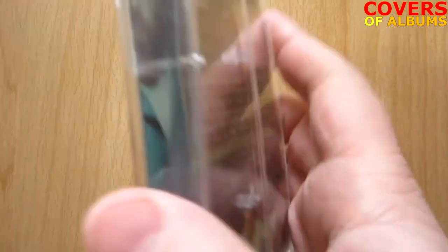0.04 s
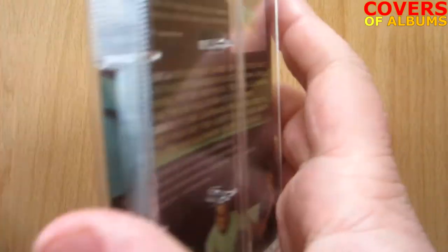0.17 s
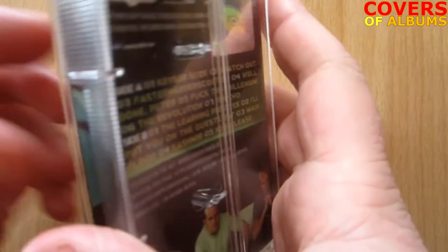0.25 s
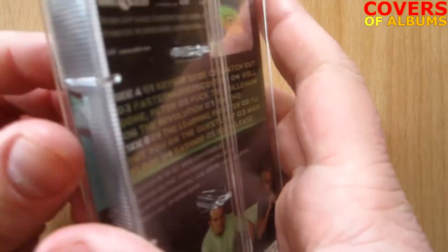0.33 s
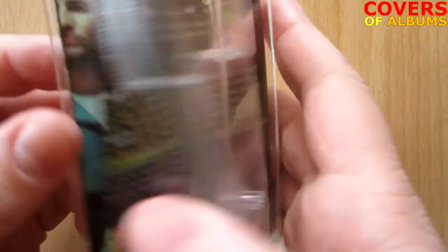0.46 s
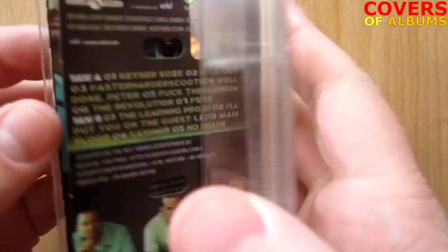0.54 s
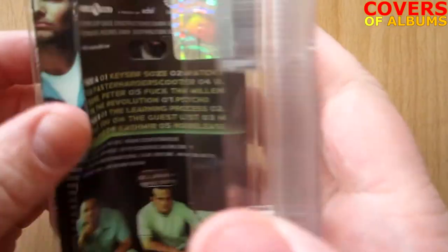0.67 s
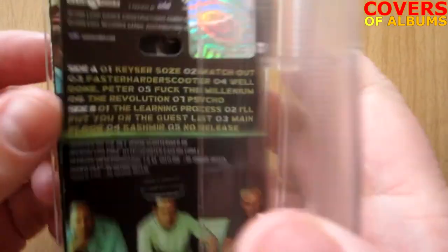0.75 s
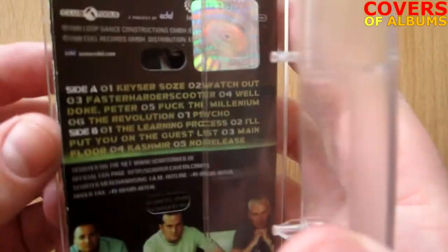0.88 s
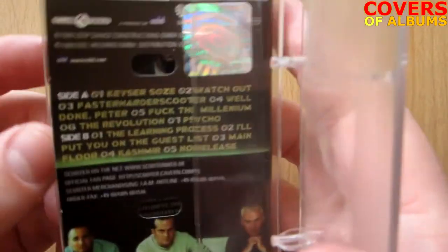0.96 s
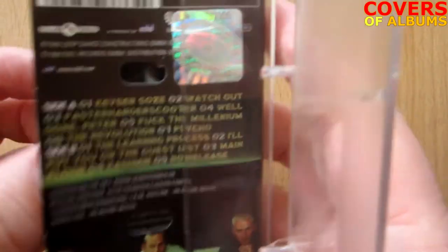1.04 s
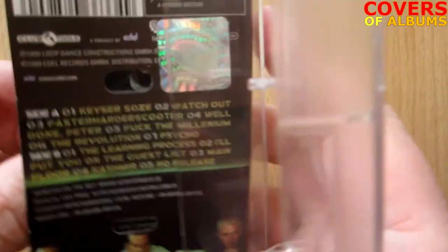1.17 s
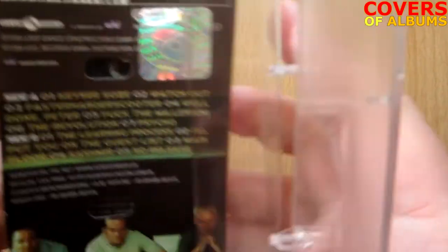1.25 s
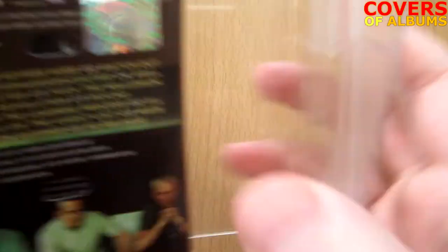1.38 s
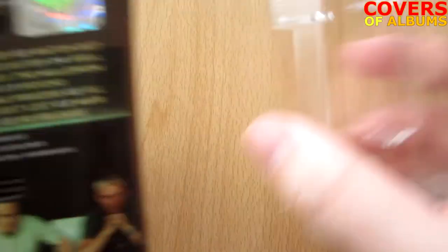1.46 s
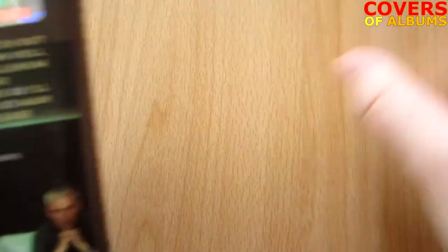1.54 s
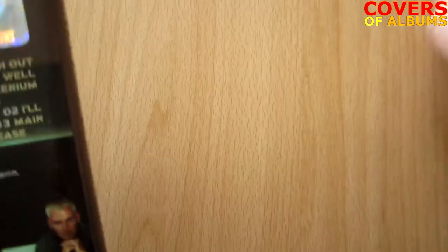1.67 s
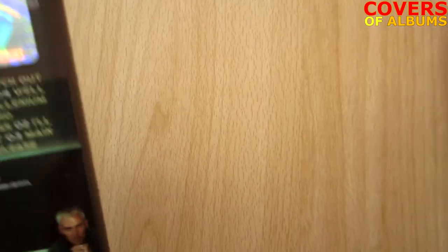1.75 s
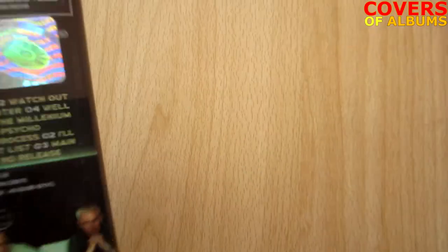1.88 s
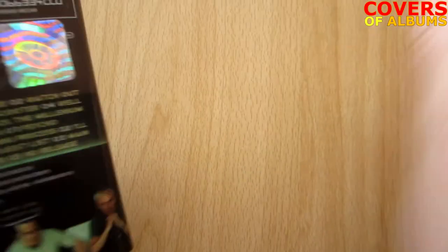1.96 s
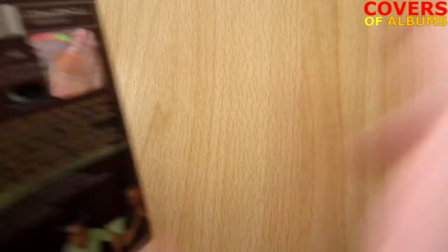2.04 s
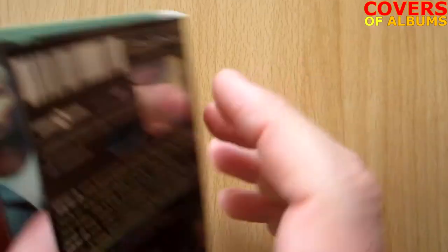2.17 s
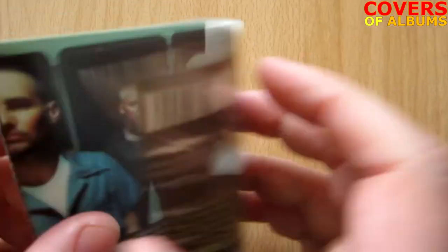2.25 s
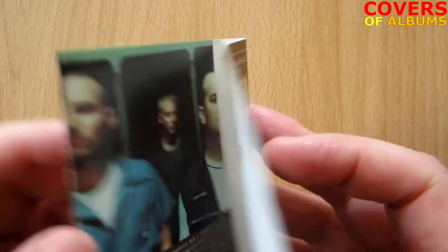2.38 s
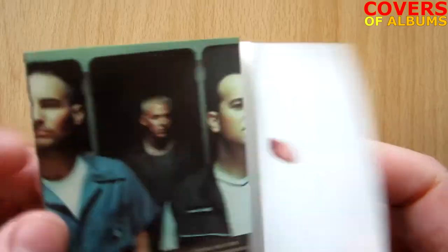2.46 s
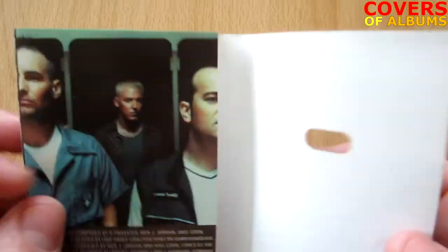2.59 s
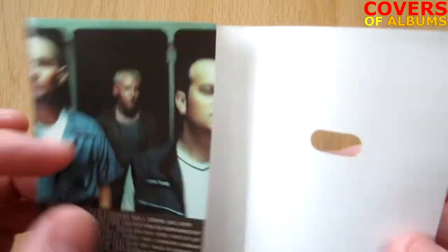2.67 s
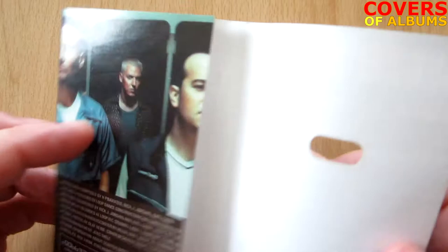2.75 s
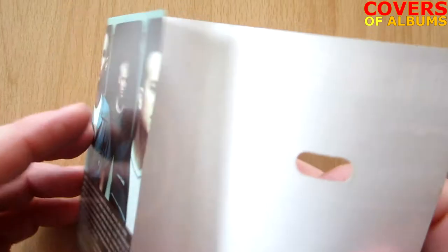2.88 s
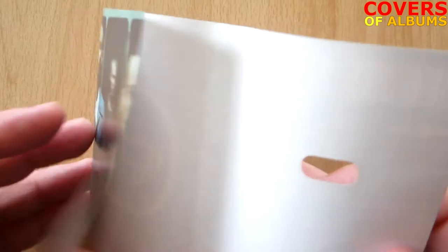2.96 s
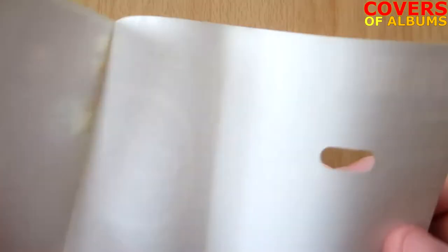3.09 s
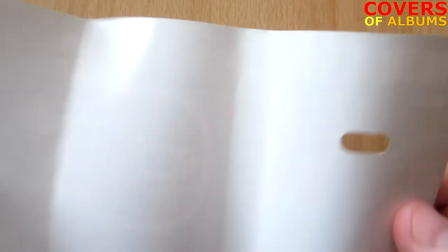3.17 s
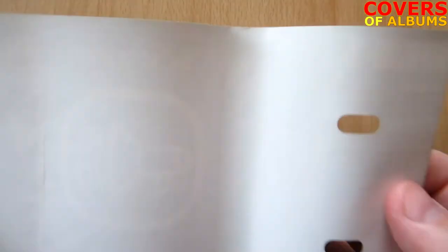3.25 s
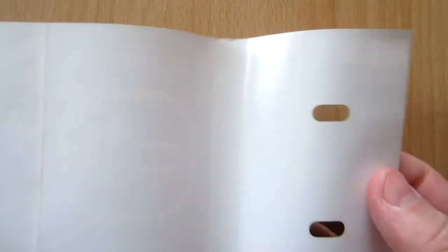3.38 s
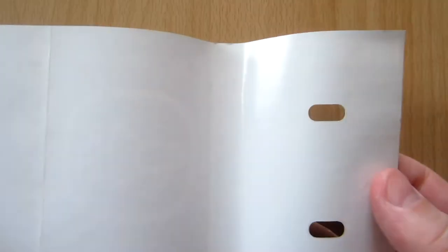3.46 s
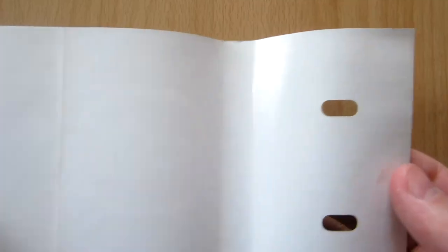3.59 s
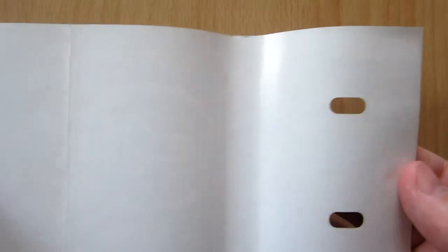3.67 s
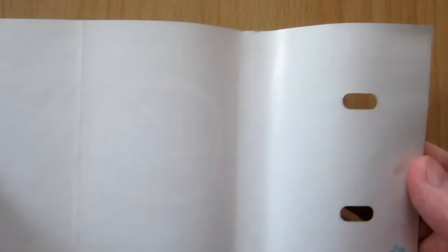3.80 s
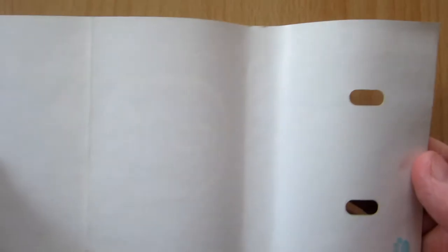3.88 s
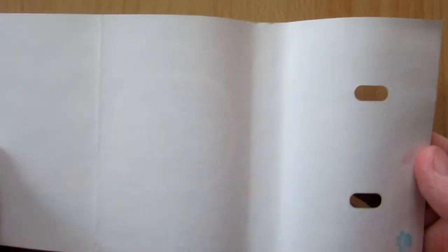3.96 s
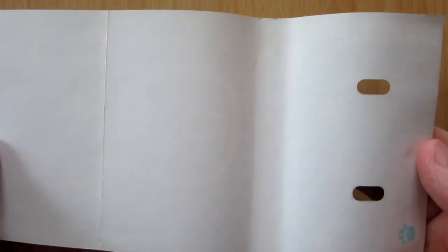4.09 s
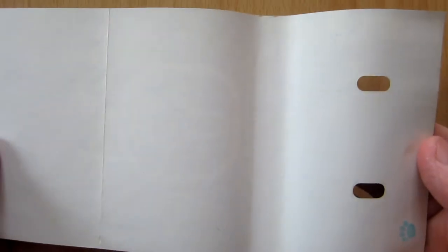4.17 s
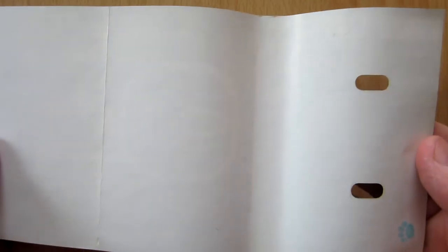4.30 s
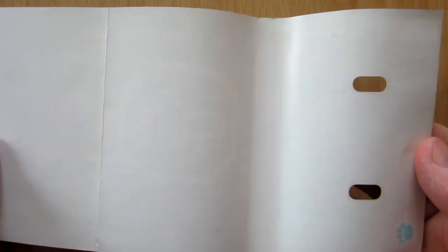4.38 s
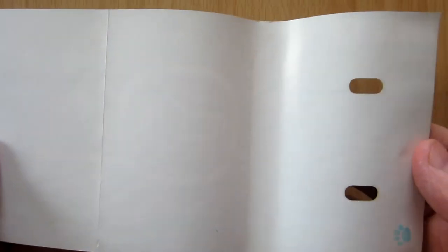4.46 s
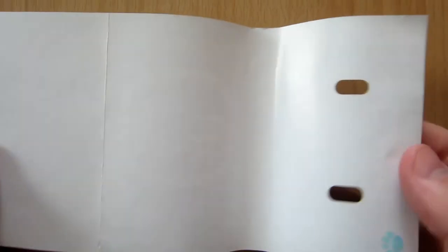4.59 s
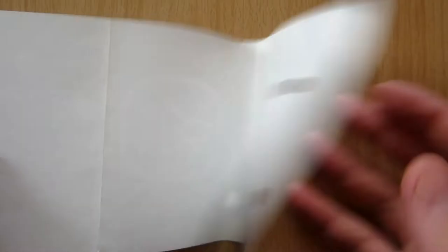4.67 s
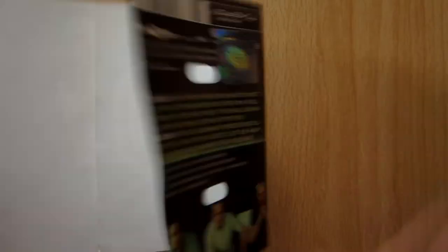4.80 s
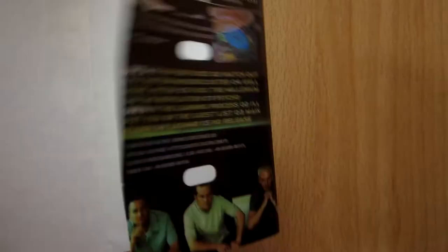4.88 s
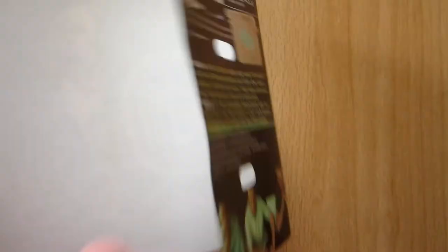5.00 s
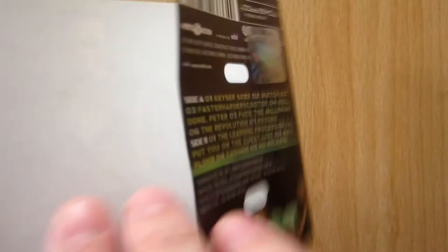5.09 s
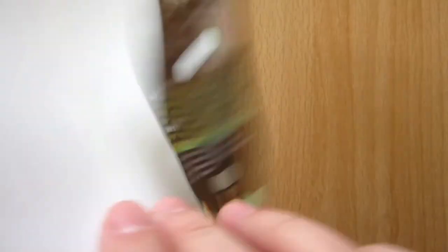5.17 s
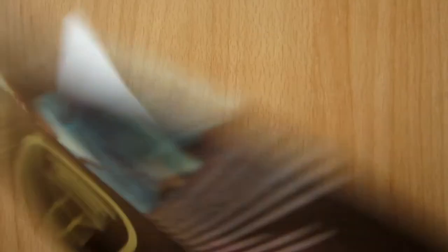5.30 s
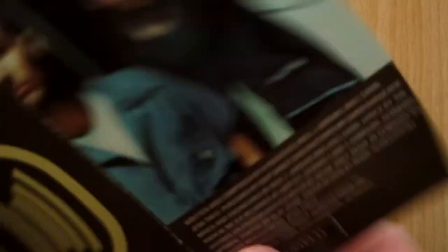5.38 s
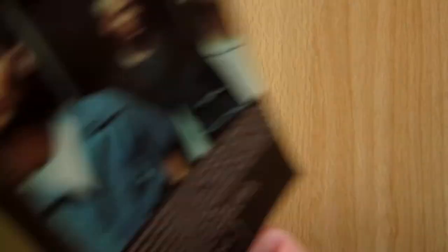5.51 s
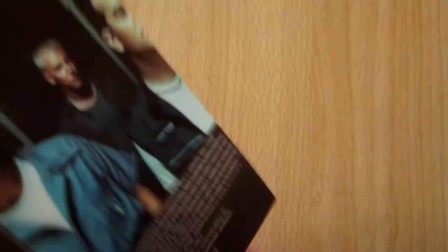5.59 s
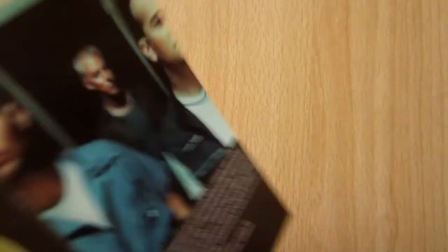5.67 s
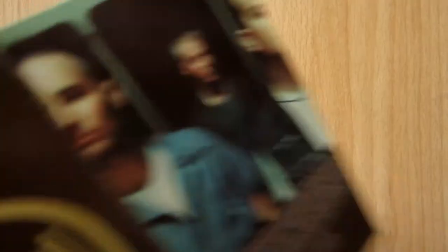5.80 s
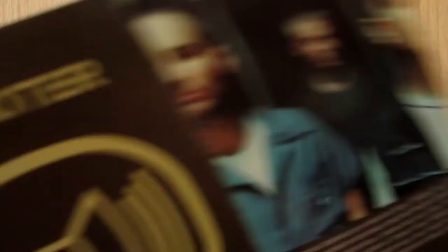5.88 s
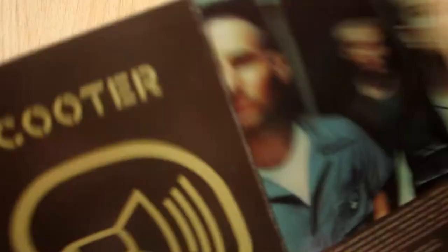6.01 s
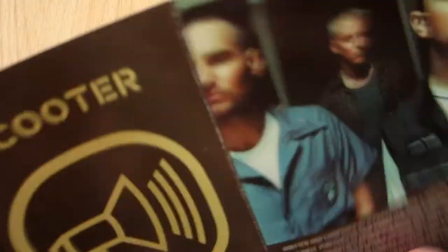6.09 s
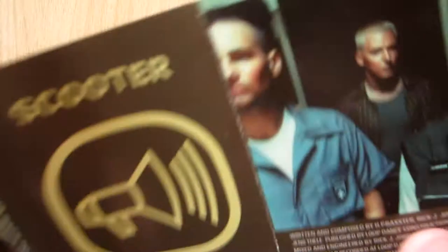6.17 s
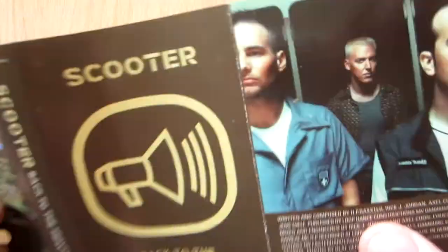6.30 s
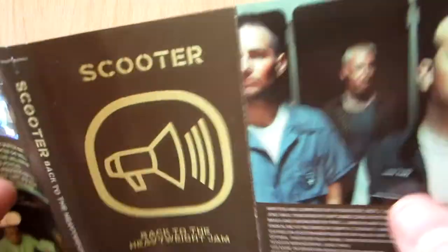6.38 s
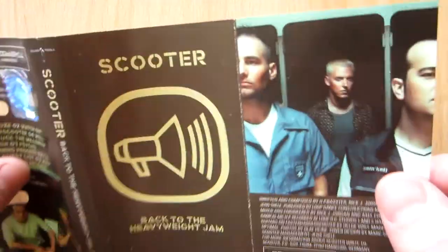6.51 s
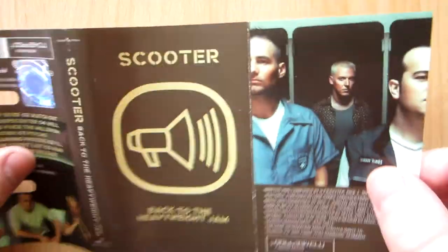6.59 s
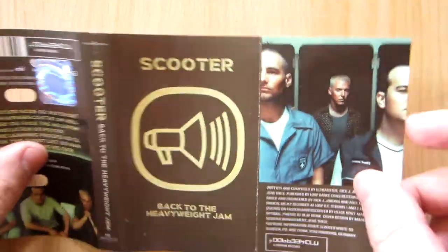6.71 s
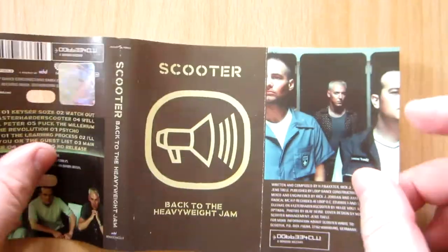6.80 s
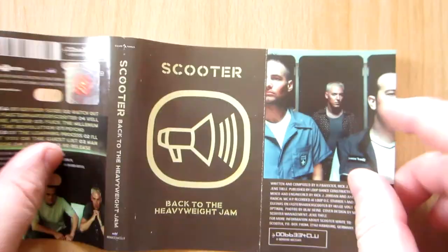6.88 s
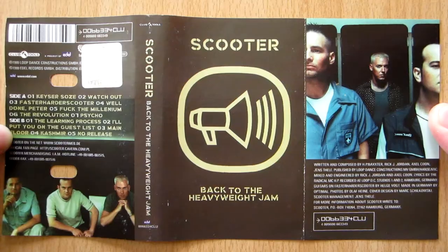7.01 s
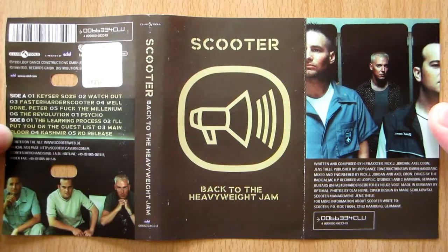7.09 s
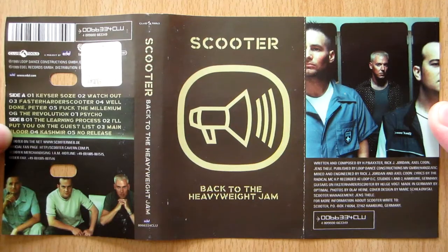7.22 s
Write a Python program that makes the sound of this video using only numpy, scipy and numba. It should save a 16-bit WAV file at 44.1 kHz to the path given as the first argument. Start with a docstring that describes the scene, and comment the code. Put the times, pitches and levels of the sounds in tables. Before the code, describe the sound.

Very close to a small camera microphone in a small room, hands clack a hard plastic case while a paper insert scrapes out of it, ending on a loud clack. After a short near-silence the sheet unfolds with light snaps and finger rubs, is held almost still over faint hiss, then flips with a sharp snap, air puffs and dull bumps on the wooden table.

```python
"""Hands slide a folded paper insert out of a plastic cassette case, close under a small camera microphone.
The case clacks, made of clicks ringing its modes, and the dragged insert scrapes as friction noise. Once it
is put down, the sheet unfolds with short resonant snaps and finger rubs, is held almost still, whistles
faintly as it tilts, then is flipped over and smoothed on a wooden table with puffs of air and dull thumps.
A small room answers the contacts, over a hiss of drawn level."""
import sys
import numpy as np
from scipy import signal
from scipy.fft import rfft, irfft, next_fast_len
from scipy.io import wavfile
from scipy.ndimage import uniform_filter1d
from numba import njit

SR = 44100
rng = np.random.default_rng(int(sys.argv[2]) if len(sys.argv) > 2 else 0)


def voltage_ratio(decibels):
    """Convert decibels (scalar or array-like) to amplitude ratios, 20 dB per decade."""
    exponent = np.asarray(decibels, float) / 20
    return 10 ** exponent


def store_pcm(level_fs):
    """Save levels as 16-bit WAV."""
    pcm = np.round(np.clip(level_fs, -1, 1) * 32767).astype(np.int16)
    wavfile.write(sys.argv[1], SR, np.atleast_2d(pcm).T)


N = 319725
TIME = np.arange(N) / SR
SILENT_DB = -110

# clacks of the case: t/s, peak level of the body/dB, strongest ring f/Hz, treble level/dB, rattle t60/s
CASE_CLACKS = [(0.024, 1, 2800, -22.5, 0.01), (0.034, -16, 3400, -17, 0.025),
               (0.167, -29, 1040, -34, 0.017), (0.336, -42.5, 1210, -24, 0.031),
               (0.409, -11.5, 1583, -22, 0.024), (0.435, -21, 1220, -23, 0.02),
               (0.477, -18.5, 3480, -18, 0.02), (0.506, -9.5, 3180, -23.5, 0.03),
               (0.635, -23.5, 2240, -32, 0.033), (0.663, -20, 2280, 6.5, 0.014),
               (0.69, -21.5, 2170, -18, 0.022), (0.763, -30.5, 1700, -6.5, 0.043),
               (0.817, -26.5, 2330, -12, 0.023), (0.847, -25.5, 2450, -29, 0.014),
               (1.07, -29, 1730, -19, 0.012), (1.127, -13, 2050, -14, 0.026),
               (1.211, -41, 3030, -22, 0.025), (1.22, -22, 1740, -27.5, 0.034),
               (1.273, -21, 2060, -12, 0.055), (1.343, -24.5, 2530, -25, 0.045),
               (1.5, -17.5, 1820, -26, 0.014), (1.525, -8, 2890, -24.5, 0.035),
               (1.612, -14, 3470, -18.5, 0.043), (1.619, -14.5, 1050, -4, 0.029),
               (1.685, -36, 3380, -29.5, 0.025), (1.71, -21.5, 1150, -26, 0.018),
               (1.719, -16.5, 1630, -33, 0.057), (1.731, -22, 1110, -29.5, 0.054),
               (1.804, -21.5, 1150, -34.5, 0.075), (1.852, -11, 1130, -31, 0.025),
               (1.868, -26, 1000, -26.5, 0.071), (1.884, -16.5, 960, -21, 0.075),
               (1.894, 0, 3460, -18.5, 0.035)]
# snaps of the paper: t/s, peak level of the body/dB, strongest ring f/Hz, treble level/dB, rattle t60/s
PAPER_SNAPS = [(2.257, -39, 2590, -20, 0.018), (2.275, -39, 2570, -20, 0.017),
               (2.307, -20.5, 2240, -33, 0.018), (2.391, -34, 2210, -15, 0.02),
               (2.438, -17.5, 2230, -14, 0.021), (2.511, -23.5, 2780, -16, 0.021),
               (2.692, -35, 1150, -11, 0.02), (2.816, -32, 4850, 0, 0.015), (2.87, -36, 3950, -25, 0.048),
               (2.969, -30, 5050, -25, 0.022), (3.008, -37, 3860, -14, 0.022),
               (3.265, -28, 4550, -24, 0.034), (3.305, -25.5, 1030, -13.5, 0.016),
               (3.427, -24.5, 2040, -20, 0.022), (3.442, -22, 1950, -20, 0.015),
               (3.889, -32, 816, -42, 0.015), (4.47, -45, 1080, -14.5, 0.022),
               (4.558, -46.5, 1470, -20, 0.018), (4.649, -35.5, 2540, -25, 0.017),
               (4.725, -14, 1260, -17, 0.036), (4.784, -41, 1620, -28, 0.014),
               (4.795, -34, 1470, -28, 0.018), (4.814, -44, 1880, -27, 0.023),
               (4.845, -39, 1206, -30, 0.02), (5.159, -28, 4630, -19, 0.02), (5.199, -17.5, 870, -9, 0.034),
               (5.223, -15.5, 2420, -16, 0.0091), (5.249, -6, 2400, -14, 0.016),
               (5.334, -24.5, 2300, -12, 0.034), (5.388, -35.5, 2340, -29.5, 0.026),
               (5.412, -34, 3860, -17, 0.028), (5.637, -28, 2230, -31, 0.022),
               (5.655, -19, 2200, -15, 0.02), (5.808, -24.5, 2100, -23, 0.026),
               (5.867, -38, 720, -13, 0.028), (5.931, -37, 2190, -27, 0.015),
               (5.996, -21.5, 2900, -28, 0.02), (6.039, -42, 5340, -11, 0.018),
               (6.107, -27, 2470, -19, 0.026), (6.136, -31, 2830, -21, 0.022),
               (6.165, -32, 2520, -18, 0.02), (6.181, -11.5, 2570, -46, 0.028),
               (6.253, -25.5, 980, -39, 0.0092), (6.309, -28, 2580, 4, 0.024),
               (6.549, -20.5, 2430, -13, 0.03), (6.576, -26.5, 1270, -28, 0.059),
               (6.66, -24, 2160, -3, 0.026), (6.701, -23, 2040, -28, 0.03), (6.769, -19, 2100, -12, 0.039),
               (6.792, -10, 2300, -29, 0.033), (6.91, -35, 3190, -22, 0.037)]
# paper dragged along the plastic: firmest t/s, swell t/s, fade t/s, level/dB, centre f/Hz
INSERT_DRAGS = [(.012, 0.044, .03, -36.5, 1854), (.03, 0.012, 0.039, -20.5, 3200),
                (.429, 0.01, 0.025, -47, 1873), (.477, 0.0077, 0.087, -30.5, 1897),
                (.507, 0.032, .065, -36.5, 2300), (.66, 0.11, .3, -49.5, 2200),
                (.763, .02, 0.15, -46.5, 1735), (.85, 0.31, .008, -46, 2223), (.956, .04, .055, -43, 2155),
                (1.04, .04, .04, -51.5, 1960), (1.062, .012, 0.099, -30.5, 2100),
                (1.1, 0.052, .05, -37.5, 3233), (1.133, .1, .036, -40.5, 2118),
                (1.227, 0.047, 0.22, -36.5, 2230), (1.351, 0.12, .04, -28, 3170),
                (1.443, 0.033, .15, -42.5, 2880), (1.535, 0.064, 0.0095, -30, 1977),
                (1.578, 0.048, 0.014, -32.5, 2985), (1.616, 0.032, 0.044, -36.5, 3400),
                (1.722, .011, 0.058, -34, 1617), (1.81, 0.015, 0.039, -35.5, 1967),
                (1.852, .01, .046, -25, 1780), (1.903, .017, 0.03, -20.5, 3364)]
# fingers rubbing the sheet: firmest t/s, swell t/s, fade t/s, level/dB, centre f/Hz
FINGER_RUBS = [(2.303, 0.0051, 0.013, -31, 2440), (2.38, 0.054, .01, -55, 3200),
               (2.492, 0.025, 0.013, -36.5, 3000), (2.572, 0.028, 0.034, -40.5, 3800),
               (2.696, .03, 0.097, -58, 3380), (2.818, 0.0054, 0.039, -45, 4650),
               (3.043, 0.018, .018, -32, 3300), (3.15, 0.072, 0.051, -55, 3000),
               (3.263, 0.036, 0.024, -46.5, 3860), (3.304, 0.036, 0.084, -67, 1400),
               (3.446, 0.054, 0.038, -46.5, 2100), (3.451, .003, 0.0073, -34, 1960),
               (3.6, 0.088, 0.041, -61.5, 5000), (4.708, 0.0083, 0.005, -21, 3450),
               (4.728, 0.025, 0.041, -37, 1500), (4.78, 0.11, 0.11, -62, 2500),
               (5.15, .008, 0.021, -32.5, 2840), (5.2, 0.014, .05, -26.5, 1800),
               (5.228, 0.012, 0.022, -20.5, 2380), (5.254, 0.041, 0.015, -18, 2310),
               (5.418, 0.037, .05, -57.5, 2680), (5.585, 0.02, 0.014, -43.5, 2680),
               (5.681, 0.033, .013, -42.5, 2800), (5.745, 0.033, 0.027, -56.5, 2400),
               (5.795, 0.011, .03, -53, 3000), (5.855, 0.068, .03, -47, 3180),
               (5.998, 0.041, 0.082, -48.5, 3020), (6.055, 0.055, 0.037, -51.5, 4530),
               (6.116, 0.02, 0.025, -41, 4120), (6.18, 0.036, 0.0072, -34.5, 3550),
               (6.314, .025, 0.034, -39, 4040), (6.415, 0.022, 0.042, -50, 3800),
               (6.445, .05, 0.039, -41, 4900), (6.545, 0.014, .015, -40, 3000),
               (6.585, .008, .03, -44, 1300), (6.635, .05, 0.072, -45, 2200),
               (6.701, 0.0093, 0.067, -40.5, 2920), (6.76, 0.072, 0.042, -42.5, 3530),
               (6.797, 0.054, 0.021, -30.5, 2400), (6.878, 0.0072, .05, -55.5, 3470),
               (6.92, .015, 0.078, -53.5, 3500), (6.972, 0.082, 0.004, -42, 3850)]
# faint rustle of the held sheet between the rubs: t/s, level/dB
HELD_RUSTLE = [(2.235, -86), (2.255, -60), (2.6, -72), (3.1, -63.5), (3.47, -61), (3.75, -71.5),
               (4.0, -78.5), (4.6, -72), (4.69, -62.5), (4.9, -78), (5.6, -73.5), (6.25, -66), (6.9, -62),
               (6.977, -59)]
# hands, case and sheet pushing air: strongest t/s, swell t/s, fade t/s, puff level/dB, boom level re puff/dB
AIR_PUSHES = [(.005, .01, 0.02, -33.5, -12), (.035, 0.015, 0.05, -51.5, 21.5), (.484, 0.022, 0.031, -43, 6),
              (.649, 0.08, 0.14, -52, -10), (1.132, 0.084, 0.036, -50.5, 2.5),
              (1.621, 0.03, 0.032, -64.5, 29.5), (1.85, 0.14, 0.11, -61.5, 22.5),
              (2.305, 0.016, 0.041, -53, -0.5), (2.444, 0.018, 0.023, -49, 4.5),
              (2.594, 0.088, 0.021, -60.5, 8), (3.248, .03, 0.094, -51, 1),
              (3.308, 0.0068, 0.028, -52.5, 20), (4.729, 0.0064, 0.13, -44, -11),
              (5.2, 0.014, 0.12, -29, 5.5), (5.26, 0.092, 0.054, -30.5, -0.5),
              (5.31, 0.043, 0.052, -34, -16), (5.665, 0.018, 0.016, -32.5, -4),
              (5.64, 0.18, .05, -56.5, 0.), (5.817, 0.042, 0.12, -45.5, -8), (6.03, .03, 0.076, -44.5, -7),
              (6.186, 0.15, 0.076, -45.5, -3.5), (6.33, .1, 0.068, -57, 3), (6.585, 0.013, 0.067, -43.5, 4)]
# fingers bumping the table or jerking the sheet: t/s, level at the start/dB, f/Hz, t60/s
DULL_BUMPS = [(.024, -29.5, 260, 0.042), (0.479, -38, 252, 0.017), (2.306, -43, 92, 0.083),
              (2.438, -38.5, 79, 0.11), (4.726, -32.5, 136, 0.039), (5.655, -25, 140, 0.072),
              (5.81, -37.5, 124, 0.09), (5.997, -30.5, 128, 0.09), (6.183, -32, 110, 0.058),
              (6.579, -32.5, 176, 0.036)]
# thin falling whistle as the sheet tilts: t/s, f/Hz, level before flutter/dB
TILT_WHISTLE = [(3.64, 13100, -100), (3.67, 13150, -83), (3.75, 12700, -81), (3.81, 11900, -74),
                (3.85, 11000, -82), (3.87, 10500, -100)]
# modes of the plastic case: f/Hz, relative level/dB, t60/s
CASE_MODES = [(1054, -7.5, 0.04), (1150, -15.5, 0.059), (1500, -27, .05), (1700, -12.5, 0.065),
              (1820, -4.5, 0.051), (2300, 5.5, 0.0074), (3140, 10, 0.0067), (3650, -4, 0.073),
              (4700, -12, 0.041), (6340, -12.5, 0.014), (8000, -6.5, 0.044)]
# spectrum of paper on plastic: f/Hz, relative level/dB
DRAG_SPECTRUM = [(290, -50), (500, -28.5), (849, -20.5), (1160, -19.5), (1670, -0.5), (2120, 1),
                 (2740, -22.5), (3900, 1), (4970, -12), (7000, -28.5), (9100, -37), (15400, -120)]
# spectrum of fingers on paper: f/Hz, relative level/dB
RUB_SPECTRUM = [(290, -21), (500, -14.5), (1140, -5), (1480, -6), (1720, -1), (2150, 4.5), (2450, 2),
                (3160, 1), (7000, -25.5), (9100, -46), (15400, -120)]
# spectrum of the scrape's treble: f/Hz, relative level/dB
SHEEN_SPECTRUM = [(2940, -31.5), (5000, 4), (8880, -1), (9770, 2.5), (12200, -3), (15500, -14.5),
                  (16300, -35.5), (16500, -67)]
# spectrum of the hiss: f/Hz, relative level/dB
HISS_SPECTRUM = [(12, -35.5), (20, 2.5), (128, -0.5), (305, -5), (342, -7), (416, -5.5), (465, -7),
                 (772, -9.5), (839, -9.5), (913, -9.5), (1110, -10.5), (8890, -23.5), (13900, -29.5),
                 (16500, -48.5)]
# drawn hiss level, which sinks after loud clacks and comes back in stages: t/s, level/dB
HISS_CURVE = [(0, -46), (.2, -65.5), (.4, -59.5), (.6, -57), (1.88, -57), (1.949, -76), (2.229, -69.5),
              (2.3, -58), (3.598, -57), (4.3, -59), (5.101, -58), (6.96, -55.5), (6.989, -63), (7.25, -62)]


def clacks():
    """Hard plastic contacts: a click and a rattle strike the modes of the case."""
    return blows(CASE_CLACKS, click=0.43, q=5.1, wide_db=4.0, ring_db=3.0, bass_hz=232, bass_db=-24)


def snaps():
    """Creases snap over: a stronger click in a narrower ring, with the case practically silent."""
    return blows(PAPER_SNAPS, click=3.83, q=8.9, wide_db=5.0, ring_db=SILENT_DB, bass_hz=110, bass_db=-21)


def blows(events, click, q, wide_db, ring_db, bass_hz, bass_db):
    """Each blow: a sharp click and a short rattle, heard through its own broad ring and the case modes."""
    length = 4096
    out = np.zeros(N + length)
    t = np.arange(length) / SR
    mode_scatter_db = 3
    for s, peak_db, hz, treble_db, t60 in events:
        push = rng.standard_normal(length) * 1000. ** (-t / np.clip(t60, .003, .08))
        push[0] += click
        # the first contact is white, whatever rings after it
        tick = unit(band(1. * (t == 0), 1000, 14000))
        narrow = unit(band(push, hz / (1 + 1 / q), hz * (1 + 1 / q)))
        wide = unit(band(push, hz / 2.34, min(hz * 2.7, 7000)))
        # modes near the pitch of the blow are struck hardest
        modes_db = [db + mode_scatter_db * rng.standard_normal() - 12.0 * abs(np.log2(f / hz))
                    for f, db, _ in CASE_MODES]
        ring = signal.fftconvolve(push, ringing(modes_db, length))[:length]
        ring = unit(band(ring, 540, 18000))
        body = narrow + voltage_ratio(wide_db) * wide + voltage_ratio(ring_db) * ring
        body = unit(body + voltage_ratio(-2.0 + 0.57 * treble_db) * tick)
        crack = unit(band(push, 5000, 14000))
        thud = unit(band(push, bass_hz, 4.07 * bass_hz))
        blow = body + voltage_ratio(treble_db) * crack + voltage_ratio(bass_db) * thud
        i = int(s * SR)
        out[i:i + length] += blow * voltage_ratio(peak_db) / np.max(np.abs(body))
    return out[:N]


def ringing(modes_db, length):
    """Impulse response of the case: one decaying sine per mode."""
    t = np.arange(length) / SR
    return sum(voltage_ratio(db) * np.sin(2 * np.pi * hz * t) * 1000. ** (-t / t60)
               for (hz, _, t60), db in zip(CASE_MODES, modes_db))


def drag():
    """The insert scrapes over the plastic and sets humming the case modes near the pitch of the contact."""
    level_db, hz = strokes(INSERT_DRAGS, bend=1.05)
    treble_db = brightness(level_db, hz, base_db=-10, db_per_octave=9.9, db_per_db=-0.092)
    rough = scratch(600., 3.5, .002)
    hum = signal.fftconvolve(rough, ringing(np.array(CASE_MODES)[:, 1], 4096))[:N]
    hum = unit(svf(hum, np.clip(hz, 800., 7000.), 1.0))
    scrape = unit(colour(rough, DRAG_SPECTRUM))
    body = scrape + voltage_ratio(-3) * hum + voltage_ratio(-2.0) * patch(rough, hz, 1.5, -2.5)
    return voltage_ratio(level_db) * (unit(body) + voltage_ratio(treble_db) * sheen(rough))


def rub():
    """Fingertips and folds slide over glossy paper, with a faint rustle of the held sheet in between."""
    level_db, hz = strokes(FINGER_RUBS, bend=1.11)
    firm = voltage_ratio(level_db) ** 2
    faint = voltage_ratio(np.interp(TIME, *np.transpose(HELD_RUSTLE), SILENT_DB, SILENT_DB)) ** 2
    rustle_hz = 3000
    level_db = 10 * np.log10(firm + faint)
    hz = (firm * hz + faint * rustle_hz) / (firm + faint)
    treble_db = brightness(level_db, hz, base_db=-9, db_per_octave=7.0, db_per_db=-0.36)
    rough = scratch(900., 2.5, .0015)
    body = unit(colour(rough, RUB_SPECTRUM)) + voltage_ratio(2.5) * patch(rough, hz, 0.84, -0.5)
    return voltage_ratio(level_db) * (unit(body) + voltage_ratio(treble_db) * sheen(rough))


def strokes(table, bend):
    """Level/dB of the summed strokes, and their last column averaged by power so the loudest one rules."""
    swell_db = 20  # rise over the swell time and fall over the fade time; bend over 1 rounds the top
    floor = voltage_ratio(SILENT_DB) ** 2
    power, mix = np.full(N, floor), np.full(N, floor * table[0][4])
    for s, swell_s, fade_s, db, value in table:
        near = slice(max(int((s - 1) * SR), 0), int((s + 1) * SR))
        t = TIME[near] - s
        distance = np.abs(np.where(t < 0, t / max(swell_s, .002), t / max(fade_s, .002)))
        p = voltage_ratio(db - swell_db * distance ** bend) ** 2
        power[near] += p
        mix[near] += p * value
    return 10 * np.log10(power), mix / power


def scratch(per_s, spread_db, smear_s):
    """Friction noise: many small catches of uneven size, each dying away quickly, over a steady scrape."""
    catches = rng.random(N) < per_s / SR
    sizes = voltage_ratio(spread_db * np.clip(rng.standard_normal(N), -2, 2))
    grip = signal.lfilter([1], [1, -np.exp(-1 / (smear_s * SR))], catches * sizes)
    return unit((1 + grip) * rng.standard_normal(N))


def patch(rough, hz, q, fold_db):
    """The free patch near the contact resonates broadly; a fold in it sings on a narrower, wandering pitch."""
    hz = np.clip(hz, 800., 7000.)
    fold_hz = hz * 2 ** (.45 * wander(25))
    broad = unit(svf(svf(rough, hz, q), hz, q) / np.sqrt(hz))
    fold = unit(svf(rough, fold_hz, 13.0) / np.sqrt(fold_hz))
    return unit(broad + voltage_ratio(fold_db) * fold)


def sheen(rough):
    """Treble of the scrape, its brightest region drifting."""
    bright = unit(colour(rough, SHEEN_SPECTRUM))
    drifting = unit(svf(bright, 9500 * 2 ** (0.47 * wander(12)), 3.2))
    return unit(bright + voltage_ratio(-6.0) * drifting)


def brightness(level_db, hz, base_db, db_per_octave, db_per_db):
    """Treble share/dB: a higher-pitched, lighter touch scrapes brighter; base_db holds at 2500 Hz, -45 dB."""
    return base_db + db_per_octave * np.log2(hz / 2500) + db_per_db * (np.maximum(level_db, -70) + 45)


def flap():
    """Slow puffs of air at the microphone and the dull boom of the bending sheet, both band-passed noise."""
    puff_db, boom_db = strokes(AIR_PUSHES, bend=1.0)
    puff = unit(band(scratch(60., 3., .012), 45, 320))
    boom = unit(band(scratch(69.0, 5.9, 0.0032), 360, 1200))
    return voltage_ratio(puff_db) * (puff + voltage_ratio(boom_db) * boom)


def thumps():
    """Each bump is a few cycles of a dull, heavily damped swing."""
    out = np.zeros(N)
    for s, db, hz, t60 in DULL_BUMPS:
        t = np.clip(TIME - s, 0, None)
        out -= voltage_ratio(db) * np.sin(2 * np.pi * hz * t) * 1000. ** (-t / t60)
    return out


def whistle():
    """A faint sine on a mostly falling pitch, its level slightly unsteady."""
    s, hz, db = np.transpose(TILT_WHISTLE)
    level_db = np.interp(TIME, s, db, SILENT_DB, SILENT_DB) + 3.0 * wander(80)
    phase = 2 * np.pi * np.cumsum(np.interp(TIME, s, hz)) / SR
    return voltage_ratio(level_db) * np.sin(phase)


def room(x):
    """A small furnished room: a diffuse noise tail whose treble dies first."""
    t60_s, treble_t60_s = 0.32, 0.27
    t = np.arange(SR // 2) / SR
    noise = rng.standard_normal(len(t))
    low = band(noise, 280, 6000) * 1000. ** (-t / t60_s)
    high = band(noise, 3100, 17000) * 1000. ** (-t / treble_t60_s)
    tail = (low + high) * np.clip(t / 0.0063, 0, 1)  # fades in over 6.3 ms
    return signal.fftconvolve(x, tail / np.sqrt(np.sum(tail ** 2)))[:N]


def hiss():
    """Microphone and room hiss: coloured noise riding on the drawn level curve."""
    s, db = np.transpose(HISS_CURVE)
    return voltage_ratio(np.interp(TIME, s, db)) * unit(colour(rng.standard_normal(N), HISS_SPECTRUM))


def unit(x):
    """Scale to rms 1."""
    return x / np.sqrt(np.mean(x ** 2))


def colour(x, points):
    """Filter by (f/Hz, level/dB) points joined on a log-frequency axis, silent outside them."""
    hz, db = np.transpose(points)
    size = next_fast_len(len(x))
    f = np.arange(size // 2 + 1) * SR / size + 1  # 1 Hz up, to keep the log finite
    gain = voltage_ratio(np.interp(np.log(f), np.log(hz), db, SILENT_DB, SILENT_DB))
    return irfft(rfft(x, size) * gain, size)[:len(x)]


def band(x, lo_hz, hi_hz):
    """Causal band-pass."""
    edges = [lo_hz, min(hi_hz, .45 * SR)]
    return signal.sosfilt(signal.butter(2, edges, "band", fs=SR, output="sos"), x)


@njit
def svf(x, hz, q):
    """State-variable band-pass whose centre may move every sample."""
    y, b, l = np.empty(len(x)), 0., 0.
    for i in range(len(x)):
        g = np.tan(np.pi * hz[i] / SR)
        v = (b + g * (x[i] - l)) / (1 + g * (g + 1 / q))
        b, l, y[i] = 2 * v - b, l + 2 * g * v, v / q
    return y


def wander(per_s):
    """Random levels held 1 / per_s seconds and smoothed; spread a little under 1."""
    k = int(SR / per_s)
    return uniform_filter1d(np.repeat(rng.standard_normal(N // k + 1), k), k)[:N]


def scene():
    """Close contacts and their room, then the air, hiss, bumps and whistle without added room."""
    near = clacks() + snaps() + drag() + rub()
    near = near + voltage_ratio(-22.5) * room(near)
    return (near + flap() + hiss() + thumps() + whistle())[None]


def top_cut(x):
    """Nothing passes above the cut-off."""
    return signal.sosfilt(signal.butter(12, 16960, fs=SR, output="sos"), x)


def record(dry):
    """The camera rounds off the loudest peaks and cuts the top."""
    peak, top_hz = .9, 16000
    soft = dry / (1 + np.abs(dry / peak) ** 4) ** .25
    dull = signal.sosfilt(signal.cheby1(8, .5, top_hz, fs=SR, output="sos"), soft)
    return top_cut(dull)


dry = scene()
out = record(dry)
store_pcm(out)
```